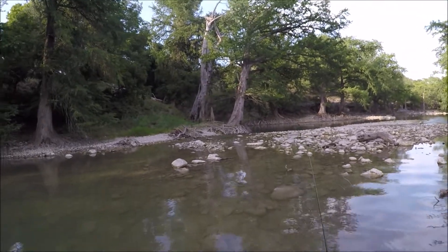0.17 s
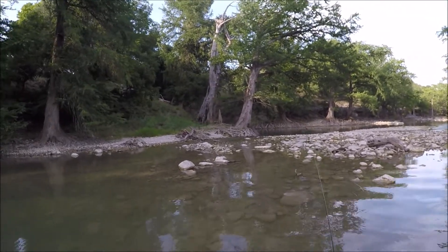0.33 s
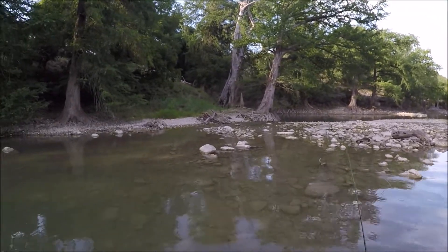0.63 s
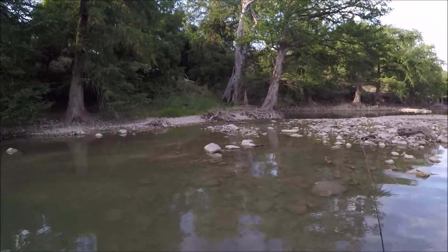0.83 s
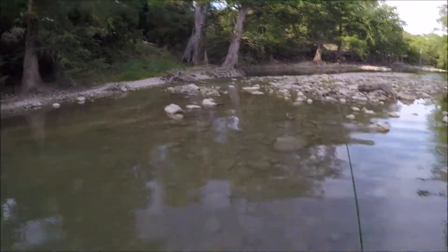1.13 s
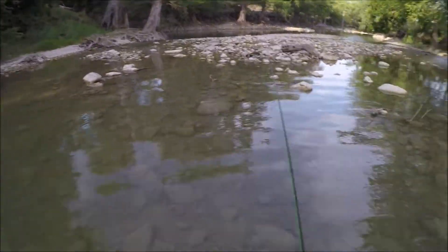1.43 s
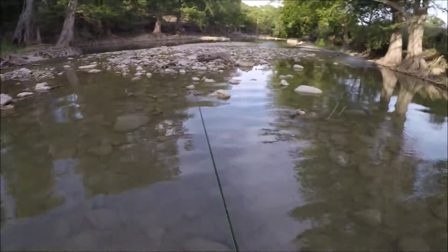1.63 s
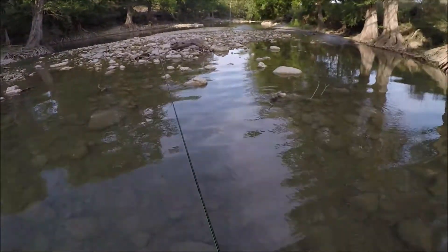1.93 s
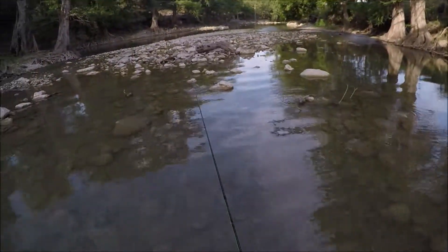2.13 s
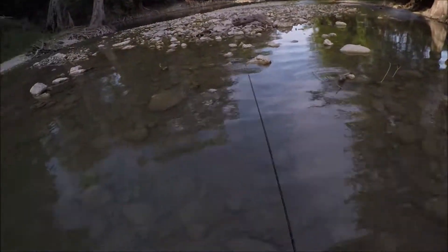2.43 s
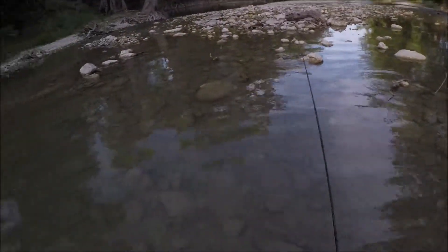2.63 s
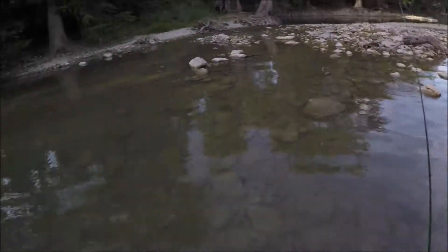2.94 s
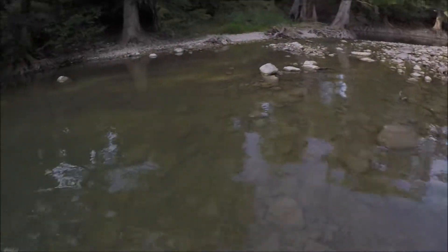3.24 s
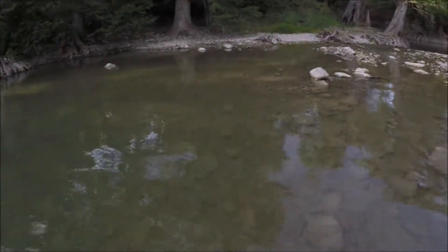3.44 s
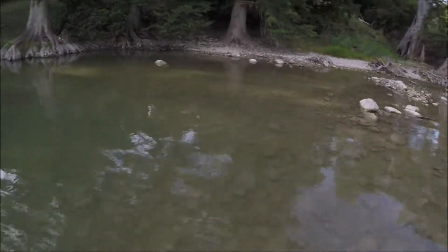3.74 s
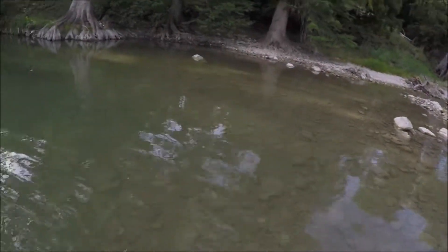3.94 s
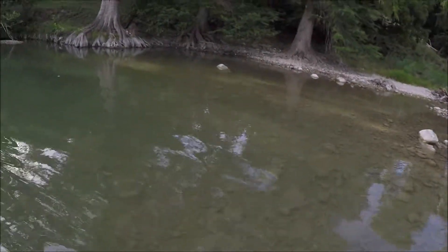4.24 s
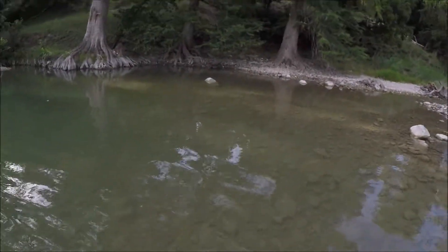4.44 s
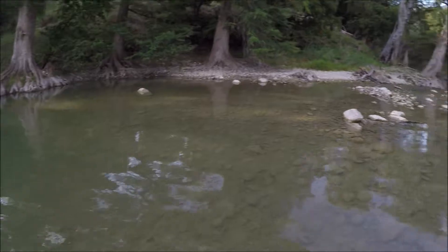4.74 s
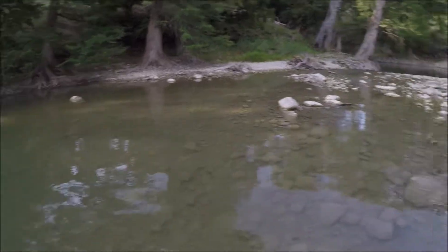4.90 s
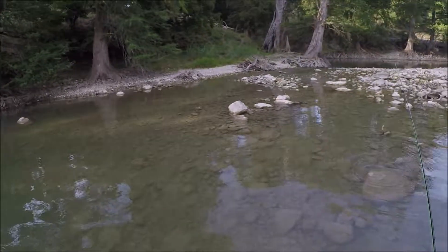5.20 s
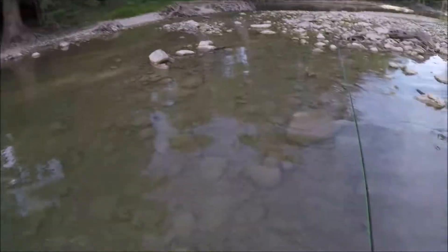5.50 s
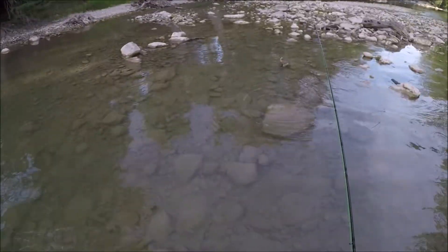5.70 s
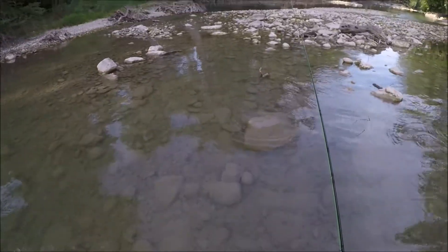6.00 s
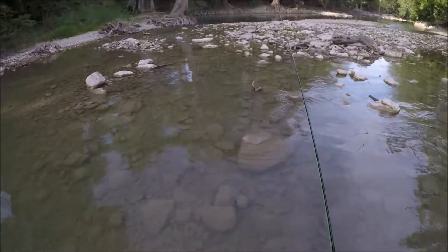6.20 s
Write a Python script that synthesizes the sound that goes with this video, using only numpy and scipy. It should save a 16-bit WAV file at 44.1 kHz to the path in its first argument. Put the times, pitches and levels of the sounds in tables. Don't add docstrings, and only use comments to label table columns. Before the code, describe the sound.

Slow wading strides gurgle and splash in clear shallow water, with low wind buffeting, tiny metallic ticks, faint riffle hiss and late falling birdcalls.

```python
import sys
import numpy as np
from scipy import signal
from scipy.io import wavfile
from scipy.ndimage import uniform_filter1d

SR = 44100
rng = np.random.default_rng(int(sys.argv[2]) if len(sys.argv) > 2 else 0)


def inscribe(sig):
    pcm = np.round(np.clip(np.atleast_2d(sig).T, -1, 1) * 32767)
    wavfile.write(sys.argv[1], SR, pcm.astype(np.int16))


def how_loud(loudness_db):
    steps = np.asarray(loudness_db, float) / 20
    return 10 ** steps


N = 280476


def evened(x):
    return x / np.sqrt(np.mean(x ** 2) + 1e-20)


def steadied(x):
    power = uniform_filter1d(uniform_filter1d(x ** 2, size=3000), size=3000)
    return x / np.sqrt(abs(power) + 1e-20)


def read(points, hz):
    f, value = np.transpose(points)
    return np.interp(np.log(hz + 1), np.log(f + 1), value)


def curve(rows, column):
    rows = np.asarray(rows)
    return np.interp(np.arange(N) / SR, rows[:, 0], rows[:, column])


def crests(rows, depth_db):
    t = np.arange(0, N + 64, 64) / SR
    power = np.zeros(len(t))
    for s, db, rise, fall in rows:
        away = np.maximum((s - t) / rise, (t - s) / fall)
        power += how_loud(db - depth_db * away) ** 2
    return np.interp(np.arange(N) / SR, t, np.sqrt(power))


def add(mix, s, sound):
    part = mix[round(s * SR):][:len(sound)]
    part += sound[:len(part)]


def hiss(spectrum, size, patchy_db, flicker_db):
    frames, hz = 4 * N // size + 5, np.fft.rfftfreq(size, 1 / SR)
    real, imag, patches = rng.standard_normal((frames, len(hz), 3)).T
    patches = evened(uniform_filter1d(uniform_filter1d(patches, size=9, axis=0), size=8, axis=1))
    flicker = evened(uniform_filter1d(rng.standard_normal(frames), size=3))
    level_db = read(spectrum, hz)[:, None] + patchy_db * patches + flicker_db * flicker
    z = (real + 1j * imag) * how_loud(level_db)
    return evened(signal.istft(z, nperseg=size, noverlap=3 * size // 4)[1][:N])


def bubble(hz, rise, ring):
    t = np.arange(round(ring * SR)) / SR
    swell = (1 - np.exp(-t / 0.001)) * np.exp(-np.log(1000) * (t / ring) ** 1.676)
    return swell * np.sin(2 * np.pi * np.cumsum(hz * 2 ** (rise * t / ring)) / SR)


def pinch():
    pinch_s = 0.0015
    u = np.arange(200) / SR / pinch_s * 10
    return how_loud(-8) * u * (2 - u) * np.exp(1 - u)


def add_pinched(mix, s, db, hz, rise, ring):
    add(mix, s, how_loud(db) * bubble(hz, rise, ring))
    add(mix, s, how_loud(db) * pinch())


def swarm(spectrum, lo_hz, hi_hz, per_s, cycles, spread_db, count):
    pick, kind, strength = rng.random(N), rng.integers(0, count, N), rng.exponential(1, N)
    train = (pick < per_s / SR) * how_loud(spread_db * np.minimum(strength, 4))
    out = np.zeros(N)
    for k, hz in enumerate(np.geomspace(lo_hz, hi_hz, count)):
        grain = bubble(hz, 0.49 * rng.random(), cycles * rng.uniform(0.29, 1.52) / hz)
        weight = how_loud(read(spectrum, hz)) * np.sqrt(hz) / np.linalg.norm(grain)
        out += signal.oaconvolve(train * (kind == k), weight * grain)[:N]
    return evened(out)


def river():
    # f/Hz, spectral level/dB per Hz
    riffle_spectrum = [(90, 0.5), (200, -0.5), (310, 0.5), (500, -6.5), (800, -2.5), (1080, -11.5),
                       (2000, -7.5), (3700, -10), (4200, -15), (6800, -18), (7300, -20.5), (15400, -25.5)]
    # f/Hz, level/dB
    whine_tones = [(8631, -88)]
    wash = hiss(riffle_spectrum, size=512, patchy_db=2.05, flicker_db=-0.1)
    babble = swarm(riffle_spectrum, lo_hz=450, hi_hz=6000, per_s=2500, cycles=12, spread_db=2.5, count=14)
    waver_hz = 7.2 * evened(uniform_filter1d(rng.standard_normal(N), size=4000))
    whine = np.zeros(N)
    for hz, db in whine_tones:
        whine += how_loud(db + 3) * np.sin(2 * np.pi * np.cumsum(hz + waver_hz) / SR)
    return how_loud(-59.5) * (wash + how_loud(-18) * babble) + whine


def breeze():
    # t/s, level/dB, extra level of the faster eddies/dB
    wind = [(0, -49.5, 0), (.3, -42, -1), (.9, -42, -2), (1.2, -55, -2), (1.65, -36, -5), (2.1, -43, -1),
            (2.5, -43, 3), (3.2, -39, 2), (3.5, -29, 1), (3.9, -29.5, 1), (4.2, -32, 3), (4.7, -46.5, -2),
            (5.05, -51, 1), (5.55, -54.5, -3), (5.8, -46, -5), (6.25, -42, -5), (6.36, -31.5, -1)]
    # t of the crest/s, level/dB, half length/s
    gusts = [(0.295, -32.5, 0.048), (0.556, -34, 0.083), (0.734, -33.5, 0.15), (0.914, -33.5, 0.16),
             (2.608, -29.5, 0.085), (2.915, -30, 0.12), (3.1, -35.5, .08), (3.32, -32, 0.03),
             (3.44, -22, 0.052), (3.677, -20, 0.063), (3.792, -19.5, 0.056), (3.957, -21, 0.15),
             (4.15, -29, 0.094), (4.357, -20.5, 0.074), (4.562, -30, .07), (5.238, -37, .06),
             (5.363, -26, 0.035), (5.79, -34, 0.062), (6.03, -35, 0.075), (6.349, -20, 0.03)]
    # f/Hz, spectral level/dB per Hz
    buffet_spectrum = [(8, -16), (25, 1.5), (42, 5.5), (62, -3), (120, -29.5), (260, -55), (500, -102)]
    # f/Hz, spectral level/dB per Hz
    flutter_spectrum = [(35, -26), (65, 1), (95, 3.5), (140, -10.5), (220, -23.5), (330, -38), (600, -90)]
    buffet = hiss(buffet_spectrum, size=4096, patchy_db=3.5, flicker_db=2.0)
    low = steadied(signal.sosfiltfilt(signal.butter(2, 74, "low", fs=SR, output="sos"), buffet))
    deep = signal.sosfiltfilt(signal.butter(2, 55, "low", fs=SR, output="sos"), low)
    puffs = how_loud(3 * evened(uniform_filter1d(rng.standard_normal(N), size=900)))
    flutter = steadied(hiss(flutter_spectrum, size=2048, patchy_db=3.5, flicker_db=2.0) * puffs)
    wind_db, eddy_db = curve(wind, column=1), curve(wind, column=2)
    gust_push = crests([(s, db, half, half) for s, db, half in gusts], depth_db=15)
    push = np.hypot(how_loud(wind_db), gust_push)
    shake_db = eddy_db - 55 + 1.81 * (wind_db + 40)
    shake = how_loud(shake_db) * (push / how_loud(wind_db)) ** 0.42
    last = np.minimum(np.arange(N, 0, -1) / 256, 1)
    buffeting = push * (deep + how_loud(eddy_db) * (low - deep))
    return last * (buffeting + (shake + how_loud(-69.5)) * flutter)


def bird():
    # t/s, length/s, start f/Hz, end f/Hz, level/dB
    whistles = [
        (2.198, 0.072, 4680, 4200, -67),
        (5.232, 0.02, 6260, 7360, -65),
        (5.325, 0.06, 5200, 4390, -65),
        (5.503, 0.12, 5080, 4250, -63),
        (5.725, .13, 4950, 3600, -61.5),
        (5.98, .14, 4560, 3700, -60),
        (6.228, 0.1, 4680, 3500, -59),
    ]
    far, near = np.zeros(N), np.zeros(N)
    for s, length, from_hz, to_hz, db in whistles:
        u = np.linspace(0, 1, round(length * SR))
        warble_hz = 70 * evened(uniform_filter1d(rng.standard_normal(len(u)), size=60))
        hz = to_hz + (from_hz - to_hz) * (1 - u) ** 1.4 + warble_hz
        note = np.sin(np.pi * u) ** 0.32 * np.sin(2 * np.pi * np.cumsum(hz) / SR)
        is_near = to_hz > from_hz or s < 3
        add(near if is_near else far, s, how_loud(db) * note)
    t = np.arange(SR // 2) / SR
    echoes = rng.standard_normal(len(t)) * how_loud(-60 * t / 0.8)
    echoed = signal.oaconvolve(far, echoes / np.linalg.norm(echoes))[:N]
    return near + how_loud(-5) * far + how_loud(4.5) * echoed


def gear():
    # t/s, peak level/dB, ring of the fitting/dB
    ticks = [(0.9068, -52, -14), (1.242, -54, -15), (2.8734, -55, -16), (2.9572, -57, -16),
             (3.3583, -56, -21), (3.3718, -46, -20), (3.3834, -48, -17), (3.4725, -56, -20),
             (3.719, -48, -23), (3.9629, -58, -16), (4.6693, -59, -16), (5.605, -54, -3.5),
             (2.78, -56, -30), (2.832, -54, -30), (2.91, -57, -30)]
    # f/Hz, level/dB, t60/s
    modes = [(7127, 0.5, 0.11), (10550, 7.5, 0.01), (10000, -9, 0.04), (12375, -7, 0.08), (14100, -13, .05)]
    # t/s, peak level/dB, f/Hz
    bumps = [(.27, -42, 200), (0.297, -37.5, 170), (0.424, -39.5, 152), (0.517, -39, 233),
             (0.786, -38.5, 250), (0.854, -43, 260), (.892, -46, 118), (1.746, -40, 220), (2.9, -37, 130),
             (4.403, -33, 354), (5.349, -46, 139), (6.327, -40, 171)]
    out, t = np.zeros(N), np.arange(6000) / SR
    ring = sum(how_loud(db - 60 * t / t60) * np.sin(2 * np.pi * hz * t) for hz, db, t60 in modes)
    bright = signal.butter(2, [8500, 13000], "band", fs=SR, output="sos")
    for s, db, ring_db in ticks:
        scratch = signal.sosfilt(bright, rng.standard_normal(len(t))) * how_loud(-60 * t / 0.017)
        add(out, s, how_loud(db) * (0.99 * scratch + how_loud(ring_db) * ring))
    for s, db, hz in bumps:
        add(out, s, how_loud(db) * bubble(hz, rise=0, ring=2.9 / hz))
    return out


def froth():
    # f/Hz, spectral level/dB per Hz
    froth_spectrum = [(120, -41), (200, -9), (292, -33), (404, -1), (522, -2.5), (800, 1), (1650, -12),
                      (2300, -21.5), (3870, -27.5), (7560, -36.5), (12000, -38.5), (15600, -83),
                      (22000, -120)]
    # t of the crest/s, level/dB, rise/s, fall/s
    surges = [(0, -47, .05, 0.75), (.35, -50.5, 0.12, 0.061), (.5, -49, 0.086, 0.15),
              (1.26, -54.5, 0.056, .15), (1.4, -46, 0.19, 0.21), (1.63, -51, 0.37, 0.42),
              (2.72, -45, .03, 0.19), (2.87, -41, .14, 0.48), (3.2, -49, 0.6, .17), (4.11, -43, 0.17, 0.24),
              (4.42, -48.5, 0.27, 0.49), (5.63, -46, .025, .2), (5.76, -47, .08, .1), (.65, -53, .08, .12),
              (5.89, -42.5, .13, 0.38), (6.2, -43.5, 0.47, 0.49)]
    small = swarm(froth_spectrum, lo_hz=428, hi_hz=2600, per_s=1500, cycles=24, spread_db=2.4, count=28)
    spray = swarm(froth_spectrum, lo_hz=1800, hi_hz=6000, per_s=350, cycles=7, spread_db=3.5, count=12)
    wash = hiss(froth_spectrum, size=256, patchy_db=3.0, flicker_db=1.5)
    lumps = uniform_filter1d(uniform_filter1d(rng.standard_normal(N), size=600), size=600)
    clumps = how_loud(1.5 * evened(lumps))
    calm_db = -65.5
    churn = np.hypot(crests(surges, depth_db=14), how_loud(calm_db)) * clumps
    return churn * (small + how_loud(-20) * spray + how_loud(-8.5) * wash)


def drops():
    # t/s, peak level/dB, f/Hz
    falls = [(0.0418, -51, 2480), (0.1254, -44.5, 3500), (0.238, -48, 3180), (0.2725, -45.5, 2800),
             (2.7177, -49, 3330), (2.78, -45, 2800), (2.828, -42, 3680), (3.0023, -36, 2720),
             (3.3712, -46, 2670), (3.919, -43.5, 2730), (3.959, -40.5, 3860), (4.033, -42.5, 3280),
             (4.062, -44, 2580), (4.109, -44, 2850), (4.2885, -41, 2540), (4.4912, -47, 2750),
             (5.652, -44, 2700), (5.7303, -41, 5300), (5.7658, -42, 4900), (5.868, -36, 3550),
             (6.2302, -41.5, 3450), (3.981, -43, 5870), (4.112, -43, 5200), (4.585, -48, 5000),
             (5.767, -41, 6800), (2.832, -38, 4960), (5.632, -44, 2120), (5.664, -45, 3900),
             (5.88, -48, 5060)]
    out = np.zeros(N)
    for s, db, hz in falls:
        add(out, s, how_loud(db) * bubble(hz, rise=0.095, ring=24.4 / hz))
        decay = how_loud(-60 * np.arange(299) / SR / 0.0035)
        slap = np.diff(uniform_filter1d(rng.standard_normal(300), size=5)) * decay
        add(out, s, how_loud(db - 6) * slap)
    return out


def pockets():
    # t/s, peak level/dB, start f/Hz, ring time/s
    trapped = [(4.021, -50, 420, .1), (.121, -40, 437, .19), (.18, -37, 541, 0.062),
               (1.21, -36.5, 319.4, 0.054), (1.222, -34, 386, .042), (1.318, -34, 400, 0.1),
               (1.444, -33, 560, 0.035), (1.662, -37, 640, 0.06), (2.654, -42, 710, 0.065),
               (2.84, -40, 320, 0.12), (2.884, -35, 304, 0.11), (3.026, -39, 700, 0.055),
               (4.298, -42.5, 662, 0.08), (4.357, -33, 528, .043), (4.501, -38.5, 350, .063),
               (4.538, -44, 310, 0.106), (4.611, -42, 675, .055), (5.609, -33, 440, 0.04),
               (5.66, -33, 954, 0.039), (5.668, -33.5, 670, 0.034), (5.688, -28.5, 590, 0.025),
               (5.632, -37, 520, .05), (5.678, -31, 800, .03), (5.785, -41, 278, 0.19),
               (5.836, -34, 530, 0.034), (6.143, -34.5, 780, 0.043), (6.147, -34.5, 548, 0.036),
               (0.137, -40, 800, .025), (.495, -42.5, 760, .035), (1.438, -33, 490, 0.037),
            (1.652, -39.5, 1000, .027), (2.698, -38, 906, .07), (3.213, -45, 422, 0.1),
            (3.263, -39, 710, 0.029), (3.995, -39, 710, .03), (4.431, -38, 430, 0.028),
            (4.656, -40.5, 1300, 0.011), (4.687, -41, 1080, 0.014), (4.745, -41.5, 815, 0.017),
            (5.645, -34.5, 560, 0.034), (5.88, -35, 636, 0.042), (6.198, -35, 863, 0.038)]
    # t/s, peak level/dB, f/Hz
    plops = [(.198, -31, 1600), (.277, -35, 1160), (.326, -34.5, 1000), (.414, -37.5, 1354),
             (.618, -33.5, 960), (1.363, -33, 700), (1.544, -32, 880), (1.564, -31.5, 800),
             (1.853, -38, 900), (2.718, -30, 1000), (2.733, -29.5, 870), (2.77, -31, 800),
             (2.818, -30, 640), (2.83, -32, 750), (2.875, -35, 1160), (3.089, -31, 557), (3.244, -32, 810),
             (4.069, -24, 880), (4.169, -33.5, 670), (4.343, -31.5, 1020), (4.344, -33, 630),
             (4.492, -32, 408), (5.895, -28, 800), (5.986, -36, 820), (6.01, -30.5, 790),
             (6.181, -33, 1010), (6.207, -30, 680), (6.225, -30.5, 577), (6.241, -36, 640)]
    # t/s, peak level/dB, f/Hz
    beads = [(.474, -41, 650), (.493, -44, 1500), (.531, -46, 1450), (.578, -48, 2250), (.17, -42, 1500),
             (1.208, -45, 1150), (1.241, -45, 1000), (1.29, -47, 2450), (1.395, -41, 1250),
             (1.408, -42, 1050), (1.455, -41, 950), (1.482, -45, 1400), (1.555, -47, 1950),
             (1.648, -45, 2250), (1.657, -40, 1100), (1.703, -40, 800), (1.836, -48, 1950),
             (2.702, -42, 1500), (2.738, -40, 1450), (2.805, -40, 1350), (2.836, -39, 1150),
             (2.932, -39, 1100), (2.958, -36, 800), (2.995, -42, 1500), (3.029, -41, 1400),
             (3.084, -43, 1500), (3.145, -40, 1050), (3.243, -41, 1500), (3.262, -47, 1950),
             (3.956, -45, 1420), (4.031, -41, 1260), (4.455, -40, 1270), (4.478, -40, 1180),
             (5.452, -48, 1200), (5.496, -47, 1150), (5.553, -45, 900), (5.608, -40, 1250),
             (5.631, -42, 1800), (5.693, -39, 1250), (5.825, -40, 1220), (5.838, -37, 1450),
             (5.845, -38, 1000), (5.894, -38, 1500), (5.908, -34, 900), (5.92, -40, 1510),
             (5.96, -36, 1410), (6.009, -38, 1760), (6.04, -37, 1140), (6.072, -37, 1360),
             (6.115, -43, 1850), (6.174, -39, 1450), (6.23, -42, 2200), (6.245, -41, 1500),
             (6.293, -40, 1450), (5.585, -48, 1900)]
    # t/s, peak level/dB, start f/Hz, rise/octaves, ring time/s
    gulps = [(0.381, -52, 239, 1.5, 0.16), (1.245, -50, 320, 0, 0.18), (1.279, -45.5, 318, 3, 0.051),
             (2.719, -38, 452, -.3, .076), (3.257, -49, 380, -1.2, 0.049), (3.868, -49, 566, 2, 0.15),
             (3.945, -55, 602, 0.37, 0.24), (.0495, -29, 590, 1.6, .05), (4.11, -45, 412, 0.3, 0.17),
             (4.271, -44.5, 280, 3.5, 0.12), (4.656, -43.5, 390, -0.6, 0.032), (5.85, -46, 343, 1.5, 0.15),
             (6.061, -41, 417, 1.9, 0.13), (6.181, -41.5, 275, 0.9, 0.094), (0.901, -54, 1110, 0.05, 0.05),
             (0, -42, 2600, 2.3, 0.014), (1.943, -42.5, 1290, 0.1, 0.016), (4.755, -47, 387, -0.1, 0.055),
             (5.795, -35.5, 2080, 0.6, 0.0086), (2.768, -40, 222.8, 2.5, .35), (4.251, -36, 390, 1.5, 0.13),
             (5.658, -26.5, 421.5, 1.8, 0.05), (4.111, -31.5, 813, -2, 0.054), (6.077, -34, 537, 0, 0.078),
             (.168, -33, 1000, -.4, .04), (.494, -43, 520, .6, .17), (.085, -40, 780, 0, .04),
             (.37, -41, 560, 0, .05), (.65, -44, 900, .2, .03), (.675, -45, 950, .4, .04),
             (1.54, -40, 420, .4, .14), (2.984, -31, 850, .3, .045), (3.11, -31.5, 720, .5, .03),
             (5.622, -28, 600, 2.4, .022), (2.925, -40, 400, .2, .05), (3.05, -44, 480, 0, .2),
             (5.9, -33, 900, .1, .04)]
    out = np.zeros(N)
    for s, db, hz, ring in trapped:
        add_pinched(out, s, db, hz, rise=0.95, ring=ring)
    for s, db, hz in plops:
        add_pinched(out, s, db, hz, rise=0.49, ring=11.4 / hz)
    for s, db, hz in beads:
        add_pinched(out, s, db + 1.5, hz, rise=0.2, ring=18 / hz)
    for s, db, hz, rise, ring in gulps:
        add_pinched(out, s, db, hz, np.clip(rise, -0.5, 2.5), ring)
    return out


def scene():
    return (river() + breeze() + bird() + gear() + froth() + drops() + pockets())[None]


def top_cut(x):
    return signal.sosfilt(signal.butter(12, 15430, fs=SR, output="sos"), x)


def record(dry):
    # t/s, lower edge f/Hz
    gaps = [(0.061, 5500), (0.34, 3670), (1.06, 5512), (1.406, 4170), (1.937, 5540), (2.132, 4478),
            (3.173, 2000), (3.39, 3100), (3.602, 3920), (3.646, 4478), (4.309, 3800), (4.605, 4260),
            (4.773, 1740), (5.417, 6029), (5.555, 3300)]
    # start t/s, end t/s
    top_gaps = [(.6, .68), (.73, .77), (.87, .97), (1.9, 1.95), (2.05, 2.1), (3.29, 3.33), (3.42, 3.46),
                (3.51, 3.82), (3.89, 4.02), (4.29, 4.42), (5.34, 5.37), (6.31, 6.36)]
    padded = np.pad(dry, [(0, 0), (0, 512)], "reflect")
    hz, t, z = signal.stft(padded, SR, nperseg=512, noverlap=448, boundary="even", padded=False)
    spared = rng.random((len(hz) // 6 + 1, len(t) // 40 + 1)) < 0.35
    spared = spared.repeat(6, axis=0).repeat(40, axis=1)[:len(hz), :len(t)]
    lost = np.zeros(z.shape[1:], bool)
    for s, edge_hz in gaps:
        half_s = 0.018 if s > 5.5 else 0.0095
        lost |= np.outer(hz > edge_hz, abs(t - s) < half_s)
    for start, end in top_gaps:
        lost |= np.outer(hz > 13000, (t > start) & (t < end))
    z = z * np.where(lost & ~spared, how_loud(-24), 1)
    z = z * (hz < 15400)[:, None]
    thinned = signal.istft(z, SR, nperseg=512, noverlap=448)[1][:, :N]
    return top_cut(thinned)


dry = scene()
out = record(dry)
inscribe(out)
```